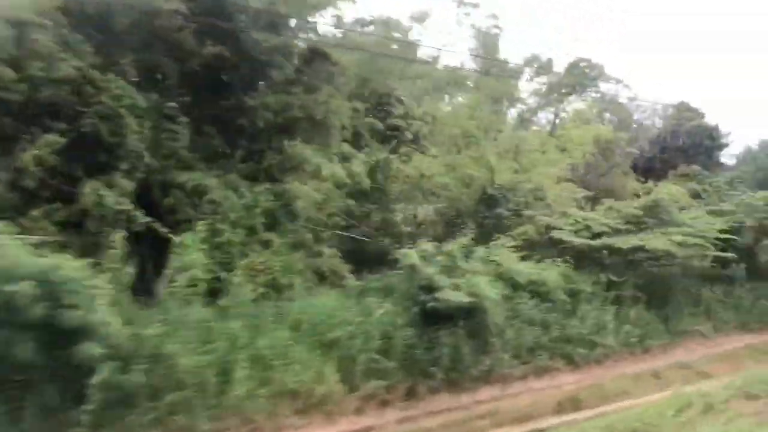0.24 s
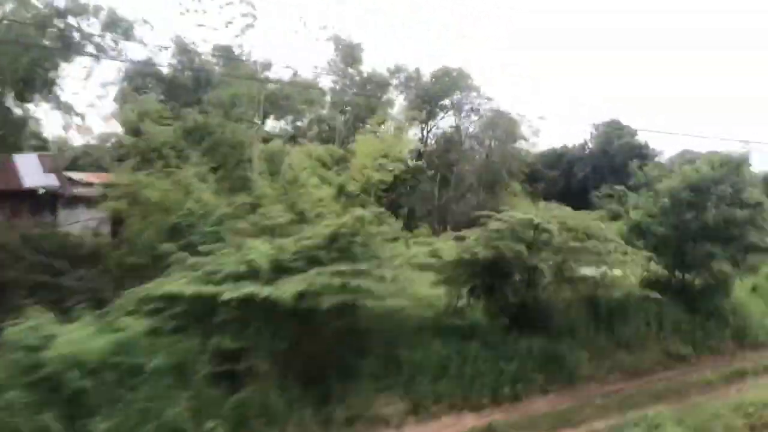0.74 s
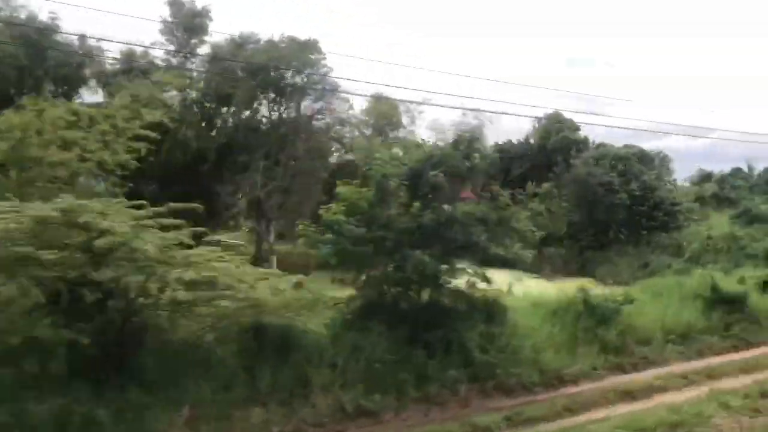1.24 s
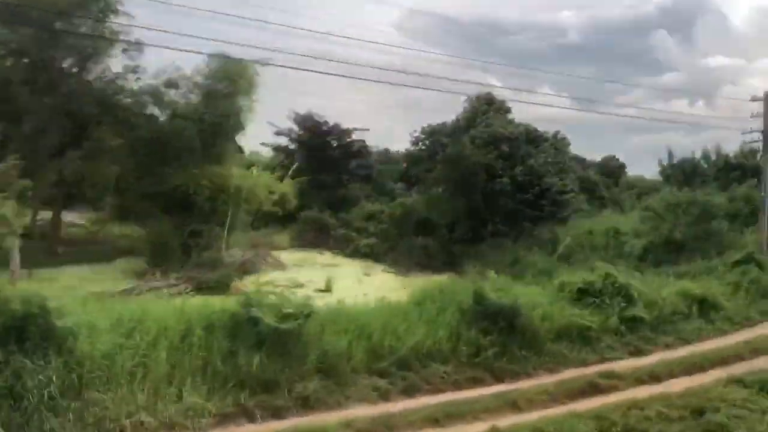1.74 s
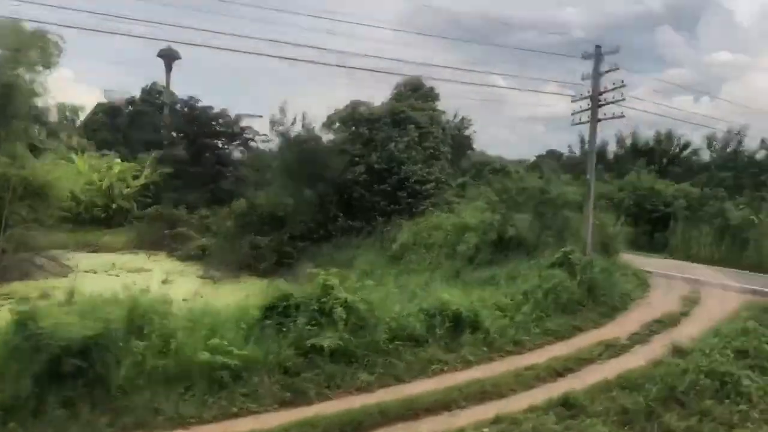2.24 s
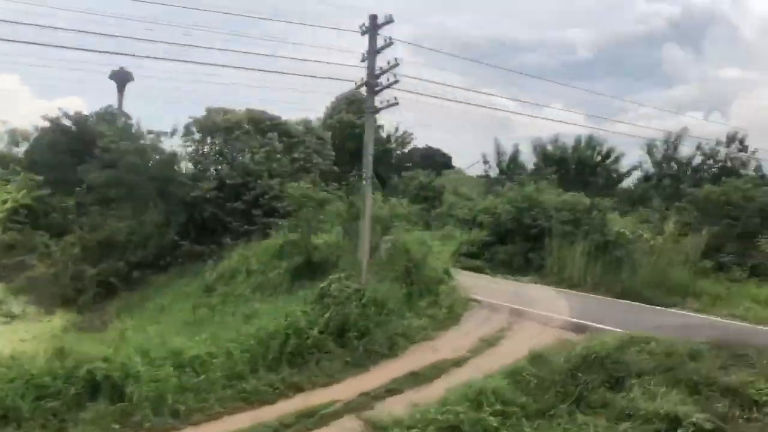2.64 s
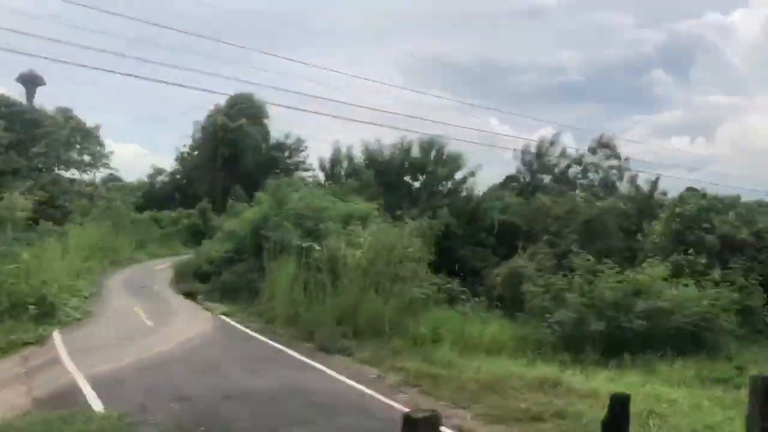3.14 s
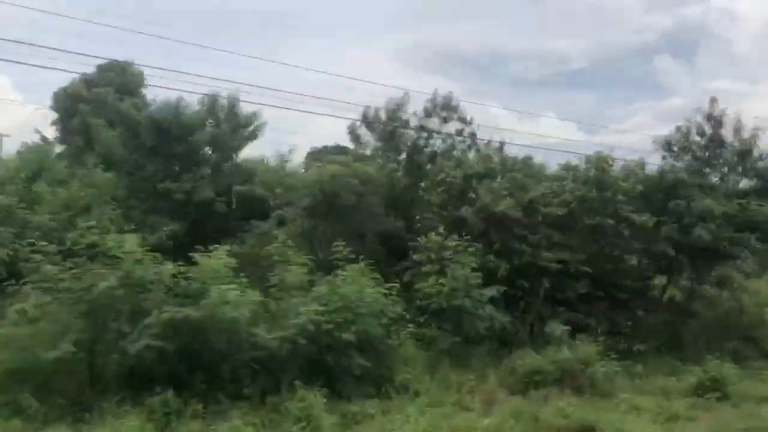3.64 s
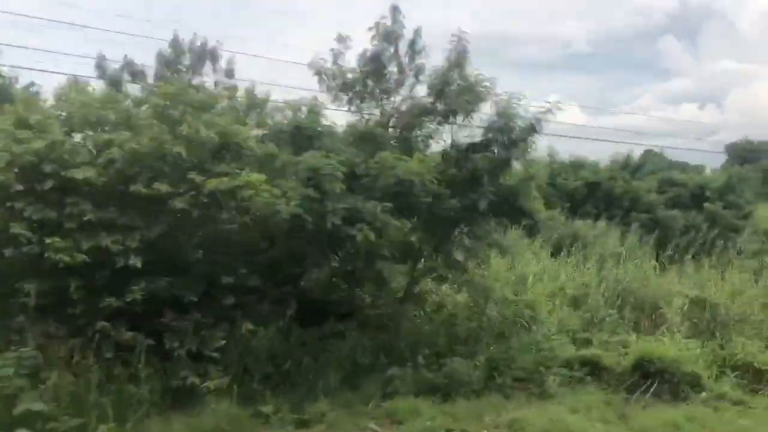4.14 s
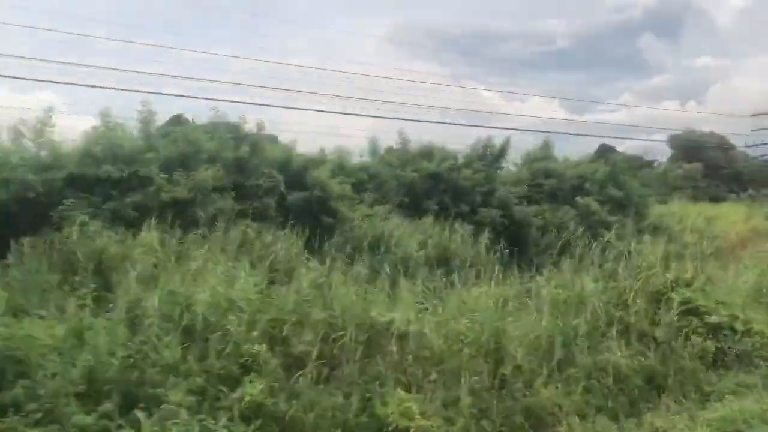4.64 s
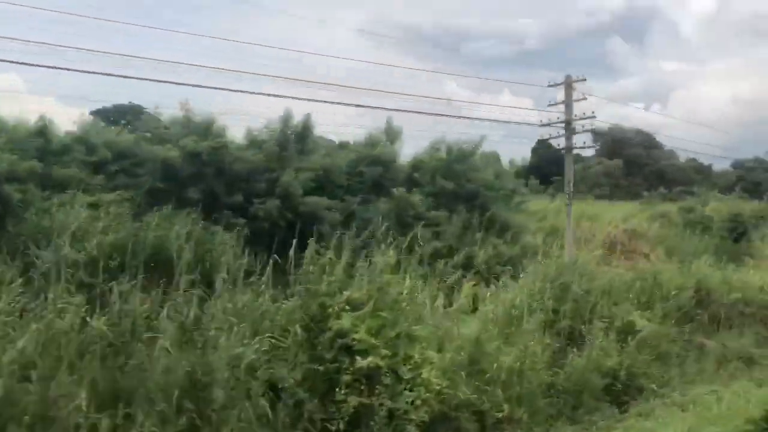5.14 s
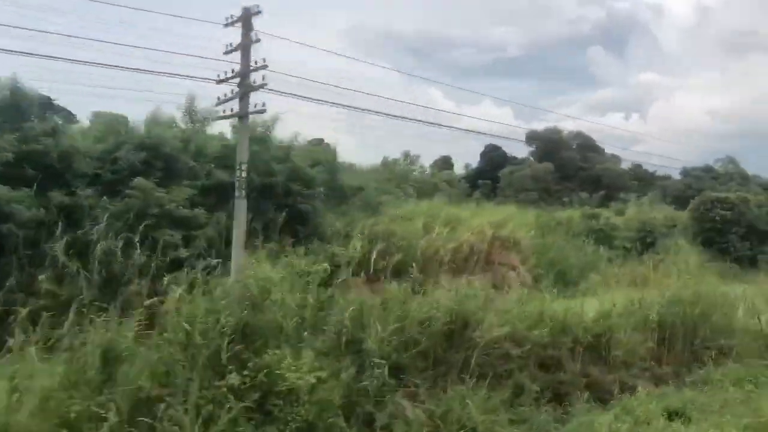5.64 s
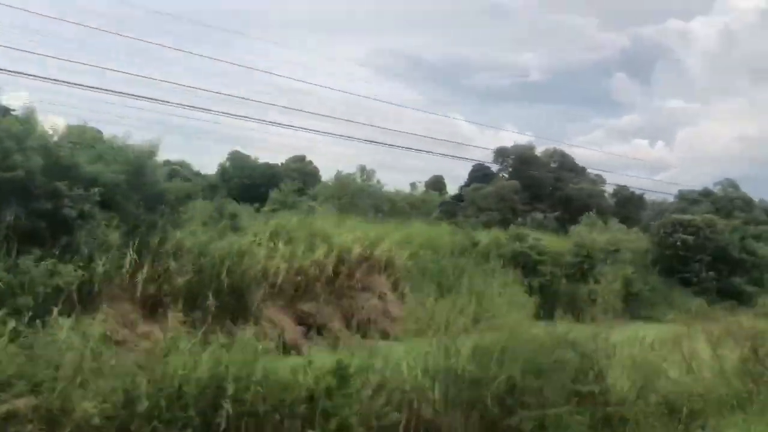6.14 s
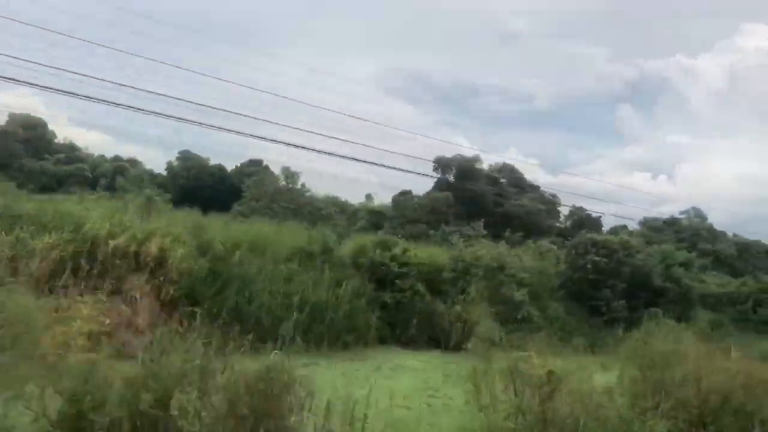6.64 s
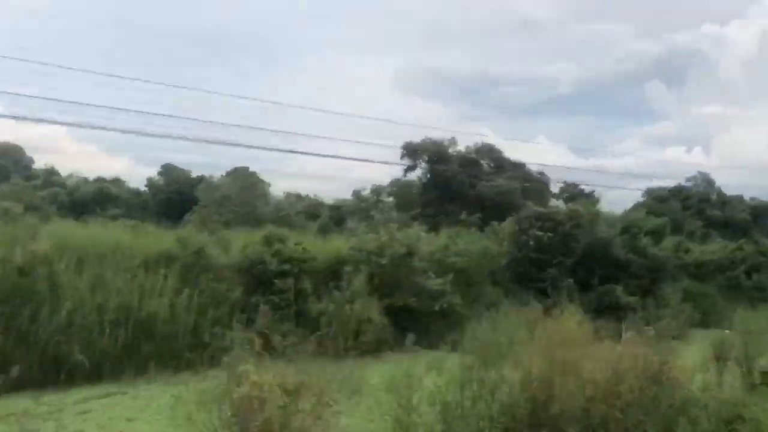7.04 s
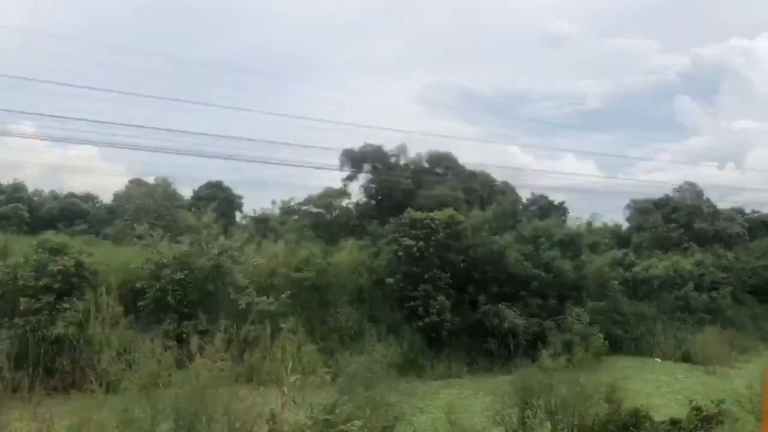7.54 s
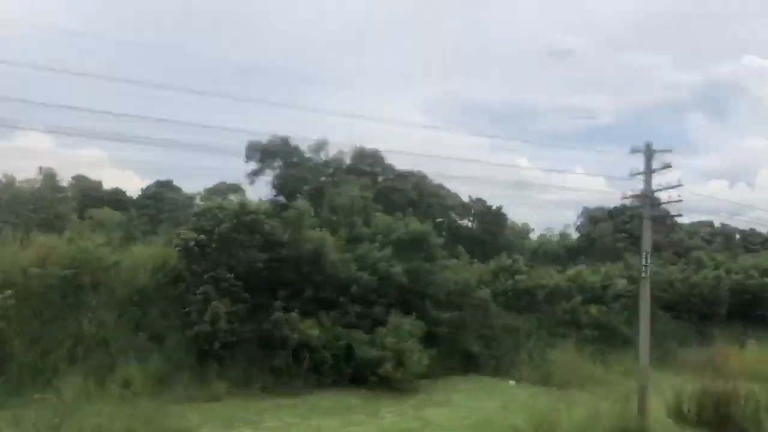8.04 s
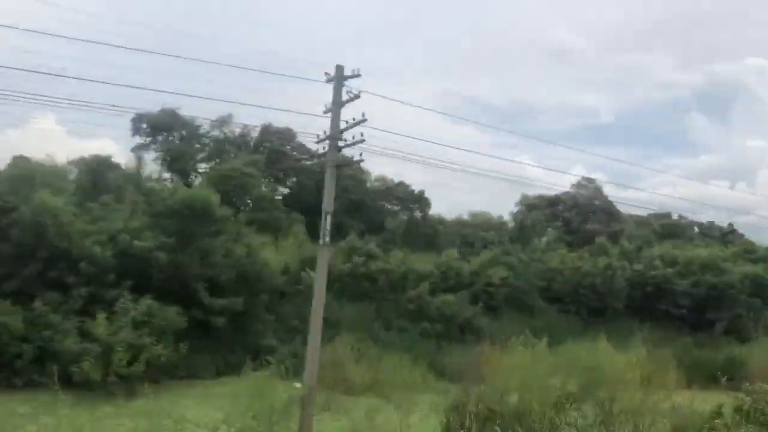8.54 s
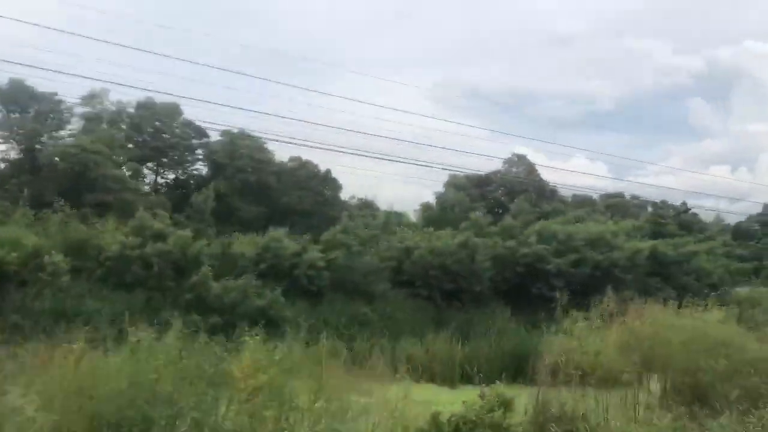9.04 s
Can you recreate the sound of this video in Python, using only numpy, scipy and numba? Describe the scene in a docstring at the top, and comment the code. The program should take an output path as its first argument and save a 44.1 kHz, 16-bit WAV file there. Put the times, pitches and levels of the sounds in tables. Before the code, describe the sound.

Loud, ragged slipstream wind batters the microphone with bassy thumps and dry crackles, briefly slackening midway, above a moving train's continuous rolling rumble.

```python
"""Wind at a train window

Microphone held at the open window of a passenger train in the countryside, close in the slipstream.
Eddies tear past as random pressure flicks; faster air slides their spectrum up, from dull flutter to cracks.
Falling sine swings make the bass kicks and thumps, short noise bursts the spits; lulls slacken the air.
Behind the wind, shaped noise makes the steady rolling and hiss of the train; a limiter holds the peaks."""
import sys
import numpy as np
from scipy import signal
from scipy.fft import rfft, irfft
from scipy.io import wavfile
from scipy.ndimage import uniform_filter1d, minimum_filter1d
from numba import njit

SR = 44100
rng = np.random.default_rng(int(sys.argv[2]) if len(sys.argv) > 2 else 0)


def master(y):
    """Save y as 16-bit WAV."""
    cut = np.clip(np.atleast_2d(y).T, -1, 1)
    pcm = np.round(cut * 32767)  # scale
    wavfile.write(sys.argv[1], SR, pcm.astype(np.int16))


N = 410130
TIME = np.arange(N) / SR   # s

# Spectrum of wheels on rails and the carriage body: f/Hz, relative level per Hz/dB
ROLLING_SPECTRUM = [(25, -21), (65, 2.5), (250, -15.5), (450, -4), (1000, -8), (1400, -18.5), (2400, -24.5),
                    (8000, -56.5)]
# Spectrum of the hiss along the carriage: f/Hz, relative level per Hz/dB
HISS_SPECTRUM = [(3200, 1.5), (6000, -5.5), (7400, -9.5), (8700, -10), (12000, -20), (16000, -29)]
# Air rushing along the carriage: t/s, hiss level before HISS_DB is added/dB
RUSH_LEVELS = [(0.0, -54.5), (0.6, -57), (2.3, -57), (3.15, -55.5), (3.6, -57), (5.2, -59.5), (6.3, -60.5),
               (7.5, -57.5), (8.3, -58), (8.55, -60.5), (9.3, -59.5)]
# Brief airy swishes: t/s, noise rms at the top of the swell/dB
AIRY_SWISHES = [(0.12, -58), (3.15, -50), (7.47, -59), (7.755, -58), (8.21, -49), (8.32, -52)]
ROLLING_DB, HISS_DB = -33.5, 13   # HISS_DB is added to the rush levels

# Slipstream, with one long slack spell: t/s, air speed/multiple of the usual
SLIPSTREAM_SPEED = [(0.0, 0.95), (0.6, 1.02), (2.0, 0.88), (2.5, 1.0), (3.4, 0.9), (4.6, 0.78), (5.2, 0.56),
                    (5.65, 0.4), (5.85, 0.78), (6.8, 0.72), (7.5, 1.05), (8.1, 0.76), (8.8, 0.82),
                    (9.0, 1.05)]
# Lulls in which the wind lets go of the microphone: t of the middle/s, length/s
WIND_LULLS = [(0.2, 0.1), (1.191, 0.046), (1.374, 0.1), (2.058, 0.062), (3.435, 0.037), (3.624, 0.065),
              (3.867, 0.081), (5.14, 0.068), (5.351, 0.06), (5.625, 0.11), (5.719, 0.056), (6.282, 0.031),
              (6.535, 0.042), (6.73, 0.038), (7.491, 0.038), (7.766, 0.025), (8.24, 0.036), (8.82, 0.047)]
LULL_SHARE = 0.5   # share of the air speed lost in a lull

# Strongest eddies that hit the microphone: t/s, peak air speed/multiple of the usual
STRONG_EDDIES = [(0.074, 2.02), (0.134, 1.87), (0.244, 2.6), (0.258, 1.7), (0.273, 2.81), (0.366, 1.6),
                 (0.451, 1.77), (0.475, 1.7), (0.493, 2.6), (0.566, 1.7), (0.588, 1.7), (0.672, 2.67),
                 (0.746, 1.33), (0.793, 2.7), (0.916, 1.95), (1.005, 1.87), (1.065, 1.75), (1.109, 1.5),
                 (1.161, 1.46), (1.225, 1.42), (1.271, 2.38), (1.294, 1.52), (1.418, 3.12), (1.486, 2.3),
                 (1.497, 2.0), (1.643, 1.9), (1.716, 1.55), (1.728, 1.74), (1.906, 1.6), (1.918, 2.14),
                 (1.932, 1.8), (2.073, 1.67), (2.104, 2.73), (2.21, 1.8), (2.223, 1.55), (2.314, 1.59),
                 (2.349, 1.65), (2.43, 1.48), (2.472, 2.43), (2.488, 2.02), (2.51, 2.19), (2.592, 2.78),
                 (2.652, 2.9), (2.679, 2.18), (2.689, 3.05), (2.746, 1.76), (2.786, 1.79), (2.825, 2.6),
                 (2.886, 1.8), (2.986, 1.63), (3.03, 1.84), (3.045, 3.52), (3.108, 3.37), (3.181, 2.14),
                 (3.2, 1.89), (3.243, 1.6), (3.324, 2.12), (3.351, 3.81), (3.392, 1.57), (3.565, 2.01),
                 (3.724, 2.8), (3.744, 2.1), (3.79, 1.66), (3.814, 2.05), (3.892, 2.15), (3.971, 2.48),
                 (3.991, 3.72), (4.075, 1.5), (4.091, 2.85), (4.298, 3.37), (4.398, 2.56), (4.422, 2.04),
                 (4.462, 2.75), (4.51, 1.64), (4.588, 2.1), (4.807, 3.5), (4.881, 1.55), (4.985, 1.85),
                 (5.078, 2.31), (5.181, 3.23), (5.41, 0.95), (5.496, 1.75), (5.546, 1.45), (5.659, 0.85),
                 (5.77, 1.69), (5.866, 1.5), (5.896, 2.0), (5.975, 1.47), (6.004, 1.55), (6.049, 1.6),
                 (6.081, 1.35), (6.112, 1.36), (6.184, 2.14), (6.31, 2.65), (6.346, 1.9), (6.355, 2.19),
                 (6.369, 1.8), (6.46, 1.58), (6.485, 2.8), (6.59, 1.3), (6.686, 1.67), (6.7, 2.5),
                 (6.75, 1.25), (6.782, 1.33), (6.851, 1.83), (6.87, 1.7), (6.939, 1.39), (7.016, 1.75),
                 (7.055, 2.4), (7.141, 1.83), (7.204, 3.43), (7.275, 2.74), (7.345, 1.59), (7.363, 2.15),
                 (7.398, 2.52), (7.526, 1.4), (7.69, 1.51), (7.714, 1.7), (7.818, 2.25), (7.89, 2.4),
                 (7.903, 1.8), (7.927, 1.9), (7.949, 1.9), (7.965, 1.97), (8.121, 2.47), (8.157, 3.15),
                 (8.2, 1.6), (8.36, 1.88), (8.392, 1.83), (8.469, 1.7), (8.609, 1.44), (8.676, 1.48),
                 (8.881, 2.15), (8.936, 2.05), (8.982, 1.5), (9.076, 2.3), (9.1, 1.7), (9.146, 2.13),
                 (9.163, 3.5), (9.183, 1.8), (9.241, 1.9)]
# The air slackens ahead of each strong eddy and is dragged along behind it (shares of the air speed, s)
SLACK_SHARE, SLACK_LEAD_S, SLACK_S = 0.24, 0.018, 0.012
WAKE_SHARE, WAKE_S = 0.14, 0.022
# Weaker random eddies: rate at the usual air speed, typical peak as a multiple of the slipstream
STRAYS_PER_S, STRAY_SPEED = 11, 1.3
# Passing time of an eddy at the usual air speed (s), its spread (octaves), exponent by which speed cuts it
EDDY_S, EDDY_OCTAVES, EDDY_HASTE = 0.0078, 0.3, 0.44

# Spectrum of slow swirls pressing on the port: f/Hz, relative level per Hz/dB
BUFFETING_SPECTRUM = [(25, -41), (38, -8), (55, -3.5), (110, -9.5), (190, -14.5), (1500, -78.5)]
# Large eddies that thump: t/s, level before the level_db of thumps() is added/dB
LARGE_EDDIES = [(0.382, -3), (0.513, -4), (0.89, -2.5), (1.142, 0.5), (1.436, -4.5), (1.658, -3),
                (1.724, 1.5), (1.944, 0), (2.235, -4), (3.063, 0.5), (3.518, -0.5), (3.7, -7), (3.802, 6),
                (4.104, 4), (4.315, -1.5), (4.487, 8), (4.826, 6), (5.195, 3.5), (6.386, -4), (6.601, -9),
                (6.793, 5.5), (7.038, 2.5), (7.329, -3), (7.544, 0), (8.169, -3), (8.309, -4), (8.635, -3),
                (8.956, 2.5)]
# Bright spits as the fastest eddies tear off the edge of the port: t/s, noise rms at the top/dB
EDGE_SNAPS = [(1.418, -14.5), (2.593, -20), (3.046, -29), (3.109, -27), (4.298, -9), (4.807, -27),
              (5.183, -23.5), (7.204, -31), (7.274, -30), (8.157, -26), (9.162, -27)]
# Corners where turbulence falls by another 6 dB an octave, at the usual air speed: f/Hz
TURBULENCE_CORNERS = [250, 950, 1400, 2200]
TURBULENCE_DB, BUFFETING_DB = 7, -15   # at the usual air speed; turbulence before its filters
CUTOFF_HZ = 15900   # top of what is recorded


def from_db(db):
    """Amplitude factor for a level in dB."""
    return 10 ** (np.asarray(db) / 20)


def rms_one(x):
    """Scale x to an rms of 1."""
    return x / np.sqrt(np.mean(x ** 2) + 1e-20)


def in_time(rows):
    """Each column of a curve at every sample."""
    s, *columns = np.transpose(rows)
    return [np.interp(TIME, s, column) for column in columns]


def around(start_s, end_s):
    """The samples between two times."""
    return slice(*np.searchsorted(TIME, [start_s, end_s]))


def lagged(x, seconds):
    """One-pole smoothing: x followed with a delay."""
    r = np.exp(-1 / (seconds * SR))
    return signal.lfilter([1 - r], [1, -r], x, zi=[r * x[0]])[0]


def drift(rate):
    """Random wandering: noise through two equal poles at this rate (Hz); spread 1."""
    r = np.exp(-2 * np.pi * rate * 20 / SR)   # drawn at every 20th sample
    noise = rng.standard_normal((N + SR) // 20)
    slow = signal.lfilter([1], [1, -2 * r, r * r], noise)[SR // 20:]   # without the start-up
    return np.interp(np.arange(N) / 20, np.arange(len(slow)), rms_one(slow))


def grain(octaves, rate=270.0):
    """A quick, random factor, bounded at twice these octaves either way."""
    return 2 ** (octaves * 2 * np.tanh(drift(rate) / 2))


def coloured_noise(spectrum):
    """Steady noise with this spectrum, read on a log-frequency axis; rms 1."""
    knots, db = np.transpose(spectrum)
    hz = np.maximum(np.arange(N // 2 + 1) * SR / N, 1)
    gain = from_db(np.interp(np.log(hz), np.log(knots), db))
    return rms_one(irfft(rfft(rng.standard_normal(N)) * gain, N))


@njit
def moving_low_pass(x, corner_hz):
    """A one-pole low-pass whose corner may change at every sample."""
    out, state = np.empty(len(x)), 0.
    for i in range(len(x)):
        w = np.pi * corner_hz[i] / SR
        step = (x[i] - state) * w / (1 + w)
        out[i] = state + step
        state = out[i] + step
    return out


def train(sway_db=3.0, hiss_flicker_db=1.53):
    """Rolling rumble and the hiss of air along the carriage, as noise with wavering levels."""
    rolling = from_db(ROLLING_DB + sway_db * drift(29)) * coloured_noise(ROLLING_SPECTRUM)
    hiss_db = in_time(RUSH_LEVELS)[0] + HISS_DB + hiss_flicker_db * drift(7.5)
    hiss = from_db(hiss_db) * coloured_noise(HISS_SPECTRUM)
    return rolling + hiss


def swishes(swell_s=0.025):
    """The hiss opens for a moment into bright, even noise."""
    swell = sum(from_db(db) * np.exp(-((TIME - s) / swell_s) ** 2) for s, db in AIRY_SWISHES)
    return swell * rng.standard_normal(N)


def flow():
    """Speed of the slipstream at every sample, sagging in each lull."""
    slack = sum(np.exp(-(2 * (TIME - s) / length) ** 4) for s, length in WIND_LULLS)
    return in_time(SLIPSTREAM_SPEED)[0] * np.maximum(1 - LULL_SHARE * slack, .1)


def gusts(surge_octaves=0.19, surge_hz=7.0):
    """The slipstream surges at random, slackens just before each strong eddy and quickens in its wake."""
    speed = flow() * grain(surge_octaves, surge_hz)
    for s, _ in STRONG_EDDIES:
        near = around(s - .2, s + .2)
        age = TIME[near] - s
        slack = np.exp(-((age + SLACK_LEAD_S) / SLACK_S) ** 2)
        wake = (age > 0) * np.exp(-np.abs(age) / WAKE_S)
        speed[near] *= 1 - SLACK_SHARE * slack + WAKE_SHARE * wake
    return speed


def stray_eddies(speed_octaves=0.28, count=400):
    """Weaker eddies as rows (t/s, peak speed): more of them, and faster, when the slipstream is strong."""
    when, chance, size = rng.random((count, 3)).T
    s = when * N / SR
    stream = np.interp(s, TIME, flow())
    peak = STRAY_SPEED * stream * 2 ** (speed_octaves * (2 * size - 1))
    kept = chance < STRAYS_PER_S * stream * N / SR / count
    return np.column_stack([s, peak])[kept].tolist()


def air_speed(eddies, flutter_per_s=85.0, flutter_size=1.15, flutter_s=0.0018, rise_s=0.00045,
              between=0.66, flutter_top=1.25, eddy_rough=0.25, front_share=0.85):
    """Gusts flutter with tiny random eddies; each larger eddy takes over in a short, sputtering burst."""
    born = (rng.random(N) < flutter_per_s / SR) * rng.random(N)
    flutter = lagged(lagged(born * flutter_s * SR, flutter_s), rise_s)
    speed = gusts() * (between + flutter_size * np.tanh(2 * flutter))
    speed = np.minimum(speed * grain(0.22), flutter_top)
    ragged = grain(eddy_rough, 600)
    lengths = EDDY_S * 2 ** (EDDY_OCTAVES * rng.uniform(-1.1, 1, len(eddies)))
    for (s, peak), usual in zip(eddies, lengths):
        length = usual / peak ** EDDY_HASTE   # faster eddies pass sooner
        near = around(s - 2 * length, s + 10 * length)
        age = 2 * (TIME[near] - s) / length
        front = .5 ** ((age / front_share) ** 2)
        tail = 1 / (1 + age ** 4)
        passing = np.where(age < 0, front, tail)
        speed[near] += passing * np.maximum(peak * ragged[near] - speed[near], 0)
    return speed


def sputter(eddies, speed_share=1.3, follows=0.6, early_s=0.004, late_s=0.022, flick_s=0.0009, count=4):
    """Air speed of the few splinters round each eddy, each flicking past in about two milliseconds."""
    speed = np.zeros(N)
    for (s, peak), splinters in zip(eddies, rng.random((len(eddies), count, 2))):
        for place, size in splinters:
            at = s - early_s + place * (early_s + late_s)
            near = around(at - 2 * flick_s, at + 2 * flick_s)
            top = speed_share * peak ** follows * (1 + size) / 2
            flick = top * np.exp(-((TIME[near] - at) / flick_s) ** 2 / 2)
            speed[near] = np.maximum(speed[near], flick)
    return speed


def buffeting(speed, speed_db=7.5, lag_s=0.0068, even_s=0.2, swell_db=4.5, swell_hz=20.6):
    """Low rumble that swells just behind every rise in air speed, and heaves a little by itself."""
    swirl = coloured_noise(BUFFETING_SPECTRUM)
    swirl = swirl / np.sqrt(uniform_filter1d(swirl ** 2, int(even_s * SR)) + 1e-9)   # evened strength
    follow_db = speed_db * np.log2(lagged(speed, lag_s))   # dB per doubling of speed
    return from_db(BUFFETING_DB + follow_db + swell_db * drift(swell_hz)) * swirl


def thumps(level_db=-1.0, swing_hz=99.8, spread_octaves=0.247, slowing_s=0.0147, rise_s=.01, fall_s=0.0098):
    """A large eddy swings the pressure a few times, ever slower as it spins down."""
    out = np.zeros(N)
    draws = rng.uniform(-1.054, 1, (len(LARGE_EDDIES), 2))
    for (s, db), (size, turn) in zip(LARGE_EDDIES, draws):
        near = around(s - 3 * rise_s, s + 3 * fall_s)
        age = TIME[near] - s
        hz = swing_hz * 2 ** (2 * spread_octaves * size - np.tanh(age / slowing_s))
        swell = np.exp(-(age / np.where(age < 0, rise_s, fall_s)) ** 2)
        swing = np.sin(2 * np.pi * np.cumsum(hz) / SR + np.pi * turn)
        out[near] += from_db(db + level_db) * swell * swing
    return out


def kicks(eddies, level_db=-15.5, speed_db=2.0, swings=1.524, first_s=0.00121, fade_s=0.034,
          stumble_octaves=0.47):
    """Each eddy kicks the pressure at the port; it swings back and forth, ever slower, as the eddy leaves."""
    out, uneven = np.zeros(N), grain(stumble_octaves, 200)
    draws = rng.uniform(-1.124, 1, (len(eddies), 2))
    for (s, peak), (pace, turn) in zip(eddies, draws):
        near = around(s - first_s, s + 4 * fade_s)
        age = TIME[near] - s + first_s
        hz = swings * 2 ** (pace / 2) * uneven[near] / (age + first_s)
        swell = np.tanh((age / first_s) ** 2) * np.exp(-age / fade_s)
        gain = from_db(level_db + speed_db * np.log2(peak))
        out[near] += gain * swell * np.sin(2 * np.pi * np.cumsum(hz) / SR + np.pi * turn)
    return out


def snaps(length_s=0.00039, low_hz=3560.0, high_hz=7700.0):
    """Each spit is bright band-passed noise, over in less than a millisecond."""
    burst = np.zeros(N)
    for s, db in EDGE_SNAPS:
        near = around(s - length_s, s + length_s)
        burst[near] += from_db(db) * np.cos(np.pi * (TIME[near] - s) / (2 * length_s)) ** 2
    band = signal.butter(2, [low_hz, high_hz], "band", fs=SR, output="sos")
    return burst * rms_one(signal.sosfilt(band, rng.standard_normal(N)))


def turbulence(speed, speed_db=0.56, wander_octaves=0.53, wander_hz=59.7, port_hz=80.4,
               flicks_per_s=3200.0, smooth_share=0.3, hollow_hz=42.0):
    """Crackle of tiny pressure flicks; its spectrum slides up with air speed, as eddies pass in less time."""
    chance = np.clip(flicks_per_s * speed / SR, 1e-4, 1)
    flicks = (rng.random(N) < chance) * rng.choice([-1, 1], N) / np.sqrt(chance)   # even power
    pressure = rms_one(flicks + smooth_share * rng.standard_normal(N))
    pressure = pressure * from_db(TURBULENCE_DB + speed_db * np.log2(speed))
    wander = wander_octaves / np.maximum(speed, 1)   # slow air varies in colour more than fast eddies do
    for corner_hz in TURBULENCE_CORNERS:
        pressure = moving_low_pass(pressure, corner_hz * speed * grain(wander, wander_hz))
    pressure = pressure - moving_low_pass(pressure, hollow_hz * speed ** 2)   # fast eddies carry little bass
    return signal.sosfilt(signal.butter(2, port_hz, "high", fs=SR, output="sos"), pressure)


def recess(x, ring_hz=986.0, width_hz=1020.0, ring_db=-10.5):
    """The small hollow around the port lifts the middle of the turbulence."""
    b, a = signal.iirpeak(ring_hz, ring_hz / width_hz, fs=SR)
    return x + from_db(ring_db) * signal.lfilter(b, a, x)


def scene():
    """Wind close on the microphone, over the running train."""
    eddies = list(STRONG_EDDIES) + stray_eddies()
    speed = air_speed(eddies)
    background = train() + swishes()
    bass = buffeting(speed) + thumps() + kicks(eddies)
    crackle = recess(turbulence(np.maximum(speed, sputter(eddies))))
    return (background + bass + snaps() + crackle)[None]


def limiter(x, ceiling=1.0, release_db_per_s=144.0, ahead_s=0.00024):
    """The gain drops just before a peak and creeps back afterwards."""
    over_db = np.maximum(20 * np.log10(np.abs(x) / ceiling + 1e-9), 0)
    release_db = release_db_per_s * TIME
    held_db = np.maximum.accumulate(over_db + release_db) - release_db
    size = 2 * int(ahead_s * SR) + 1
    return x * from_db(uniform_filter1d(minimum_filter1d(-held_db, size), size))


def record(dry, low_cut_hz=50.4):
    """The microphone drops the deepest bass, peaks are limited, the top is cut."""
    low_cut = signal.butter(4, low_cut_hz, "high", fs=SR, output="sos")
    top_cut = signal.ellip(10, .1, 80, CUTOFF_HZ, fs=SR, output="sos")
    limited = limiter(signal.sosfilt(low_cut, dry[0]))
    return signal.sosfilt(top_cut, limited)[None]


dry = scene()
out = record(dry)
master(out)
```